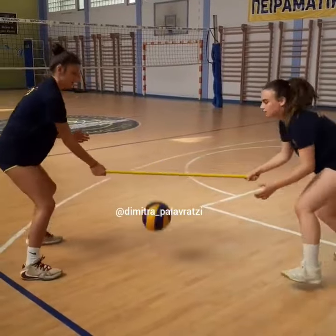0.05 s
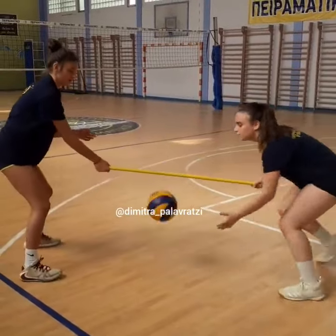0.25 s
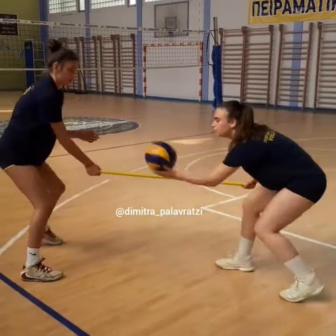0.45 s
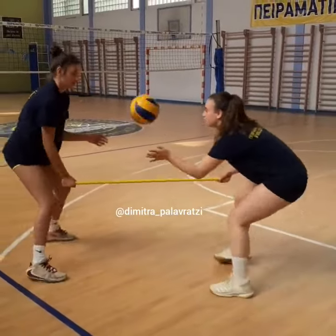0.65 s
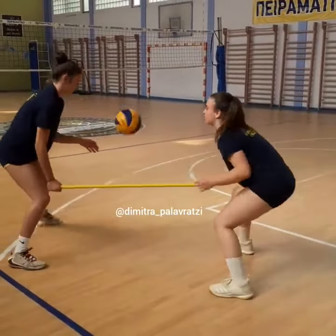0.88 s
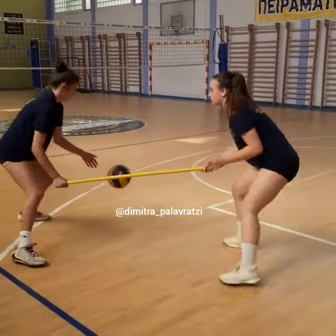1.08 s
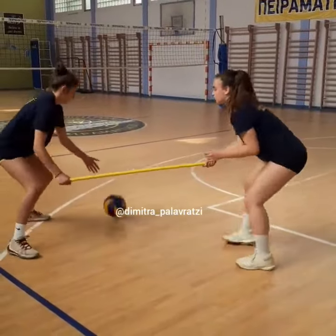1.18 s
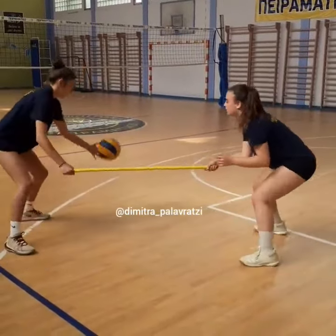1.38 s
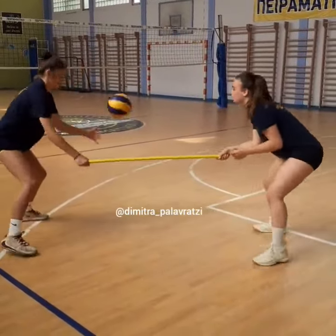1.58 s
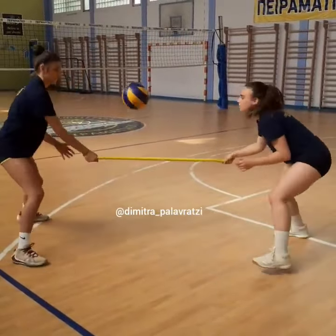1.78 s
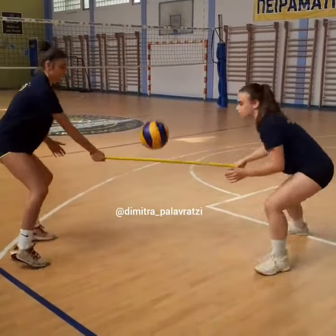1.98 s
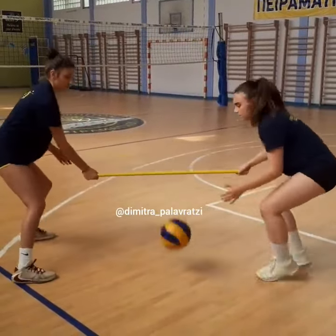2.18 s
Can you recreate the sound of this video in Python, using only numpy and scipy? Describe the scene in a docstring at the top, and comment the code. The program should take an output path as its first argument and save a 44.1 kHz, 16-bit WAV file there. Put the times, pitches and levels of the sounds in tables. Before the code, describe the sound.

A volleyball bounces with a sharp smack and low boom at about 0.2 seconds and again at 1.3, followed by a slightly duller hand slap at 1.6. The ball is close and a little to the right, and each blow echoes at length around a large gym. Soft footsteps and shoe scuffs on the wooden floor continue until about 2.2 seconds, over a faint hall rumble.

```python
"""Three sharp blows of a volleyball, bounced and slapped, echo for seconds round a large gym.
The ball is a little right of a close microphone pair. Each blow is a crack of pressure, the smack of
the cover, a low boom, a knock from the ball's wall and a brief ring of the air inside.
Two players step and scuff around it on the wooden floor, over the hall's lingering wash."""
import sys
import numpy as np
from scipy import signal
from scipy.fft import rfft, irfft, next_fast_len
from scipy.io import wavfile
from scipy.ndimage import uniform_filter1d

SR = 44100
rng = np.random.default_rng(int(sys.argv[2]) if len(sys.argv) > 2 else 0)


def int16_out(signal):
    """Quantize to a 16-bit WAV file."""
    q = np.round(np.clip(np.atleast_2d(signal).T, -1, 1) * 32767)
    wavfile.write(sys.argv[1], SR, q.astype(np.int16))


N = 99225

# Blows on the ball: start_s, crack_db, crack_top_hz, lead_db, slap_db, slap_tilt_db_per_octave, boom_db,
# shell_db, shell_tilt_db_per_octave, shell_attack_s, air_db, air_tilt_db_per_octave, echo_db,
# hall_boom_db, hall_crack_db, hall_tilt_db_per_octave
BLOWS = [(.2035, -5, 3820, -39, -25, 5, -7.5, -17, -15.5, 0.002, -31.5, -1.5, -9, -3, 1, 1.5),
         (1.2618, -4, 6170, -41, -23.5, 6, -13.5, -15, -8, 0.0096, -31, 1.5, -9.5, -3.5, 3, -3.5),
         (1.6414, -6.5, 3340, -33.5, -18, -3, -27, -18.5, 5, 0.0036, -38, 8.5, -5, -1.5, 3, 0)]
# Nearest reflection, one per blow: delay_s
NEAR_ECHO_S = [.0078, .0068, .0081]
# Treble limit, one per blow (a hand is softer than the floor): cutoff_hz
TREBLE_LIMIT_HZ = [15000, 15000, 7800]
BOOM_HZ, BOOM_T60_S, BOOM_ATTACK_S = 123, 0.067, 0.0038
LEAD_S = 0.00287  # a light touch comes before the blow
LEFT_LAG_S, LEFT_DB = 0.00005, -2  # the left microphone hears the ball later and softer
AIR_HALL_DB = -1


def ball():
    """Each blow reaches the microphones directly, then off nearby surfaces, then from the whole hall."""
    out = np.zeros((2, N))
    for echo_s, limit_hz, blow in zip(NEAR_ECHO_S, TREBLE_LIMIT_HZ, BLOWS):
        (start_s, crack_db, top_hz, lead_db, slap_db, slap_tilt, boom_db,
         shell_db, shell_tilt, shell_attack_s, air_db, air_tilt, echo_db,
         hall_boom_db, hall_crack_db, hall_tilt) = blow
        spike = amp(crack_db) * crack(start_s, top_hz)
        air = amp(air_db) * air_ring(start_s, air_tilt)
        touch = amp(lead_db) * cover_slap(start_s - LEAD_S, slap_tilt)
        smack = amp(slap_db) * cover_slap(start_s, slap_tilt)
        bright = filtered(spike + air + touch + smack, lambda hz: 1 / np.sqrt(1 + (hz / limit_hz) ** 6))
        boom = amp(boom_db) * damped_mode(start_s, BOOM_HZ, BOOM_T60_S, BOOM_ATTACK_S)
        low = boom + amp(shell_db) * shell_knock(start_s, shell_tilt, shell_attack_s)
        near = bright + low + amp(echo_db) * delayed(bright, echo_s)
        at_mics = amp([[LEFT_DB], [0]]) * delayed(near, np.array([[LEFT_LAG_S], [0]]))
        clap = filtered(spike, lambda hz: amp(hall_tilt * np.log2(np.maximum(hz, 600) / 2000)))
        into_hall = amp(hall_crack_db) * clap + amp(hall_boom_db) * low + amp(AIR_HALL_DB) * air
        out += at_mics + wall_echoes(bright) + hall_tail(into_hall[None])
    return out


def crack(start_s, top_hz, low_hz=740):
    """The short drop in pressure at first contact."""
    impulse = signal.unit_impulse(N, round(start_s * SR))
    spike = signal.lfilter(*signal.butter(2, top_hz, fs=SR), impulse)
    spike = signal.lfilter(*signal.butter(1, low_hz, 'high', fs=SR), spike)
    return -spike / spike.max()


# Spectrum of the cover's smack: frequency_hz, level_db
SLAP_SPECTRUM = [(200, -31), (500, 4), (900, -15), (2500, 5.5), (3800, -3), (6000, 0.5), (8500, -12),
                 (10000, -10.5), (12500, -15), (16000, -19)]


def cover_slap(start_s, tilt):
    """The cover smacks flat; a harder surface gives more treble."""
    spectrum = [(hz, db + tilt * np.log2(max(hz / 3000, 1))) for hz, db in SLAP_SPECTRUM]
    return noise_burst(start_s, spectrum, t60_s=0.025)


# Modes of the ball's air and cover: pitch_hz, level_db, t60_s
AIR_MODES = [(705, -7, .08), (810, -5, .08), (890, -2, .09), (1030, 0, .08), (1290, -1, .12),
             (1395, -5, .09), (1890, -2, .06), (2050, -4, .06), (2235, -7, .06), (2475, -6, .05),
             (2720, -5, .05), (3160, -7, .05), (3500, -10, .05)]


def air_ring(start_s, tilt):
    """The inflated ball rings briefly, each mode with a random polarity."""
    out = np.zeros(N)
    for hz, db, t60_s in AIR_MODES:
        gain = rng.choice([-1, 1]) * amp(db + tilt * np.log2(hz / 1500))
        out += gain * damped_mode(start_s, hz, t60_s, attack_s=0.00027)
    return out


# Low modes of the ball's wall: pitch_hz, level_db, t60_s
SHELL_MODES = [(226, -4.5, 0.036), (299.6, 2, 0.038), (378.4, -11.5, 0.08)]


def shell_knock(start_s, tilt, attack_s):
    """The ball's wall gives a hollow knock a millisecond after contact."""
    pivot_hz = SHELL_MODES[1][0]
    return sum(amp(db + tilt * np.log2(hz / pivot_hz)) * damped_mode(start_s + 0.001, hz, t60_s, attack_s)
               for hz, db, t60_s in SHELL_MODES)


# Steps around the ball: start_s, thud_db, tap_db, tap_t60_s
STEPS = [(0.067, -40, -42.5, .04), (0.2199, -46, -23.5, 0.059), (0.384, -23.5, -51, 0.045),
         (.494, -35, -37, 0.045), (0.661, -25, -38, 0.032), (0.832, -35, -60, 0.053),
         (1.377, -20.5, -52, 0.017), (1.503, -21.5, -44, .04), (1.556, -18.5, -58, .04),
         (1.8896, -58, -27, 0.022), (2.1746, -36, -36, 0.066), (2.2224, -27, -32.5, 0.1),
         (2.243, -33, -28.5, 0.039)]
# Spectrum of a sole tapping wood: frequency_hz, level_db
TAP_SPECTRUM = [(150, -16), (500, 2), (900, 16.5), (2000, 11.5), (3500, 13.5), (5800, 3.5), (8000, -6),
                (10000, -5), (15000, -37)]
THUD_HZ, THUD_T60_S, THUD_ATTACK_S, STEP_HALL_DB = 109.4, 0.15, 0.0058, -3


def footfalls():
    """Shoes tap the sprung floor, which thuds under them; the hall answers."""
    steps = np.zeros((2, N))
    for start_s, thud_db, tap_db, tap_t60_s in STEPS:
        steps += amp(thud_db) * damped_mode(start_s, THUD_HZ, THUD_T60_S, THUD_ATTACK_S)
        steps += amp(tap_db) * noise_burst(start_s, TAP_SPECTRUM, tap_t60_s)
    return steps + amp(STEP_HALL_DB) * hall_tail(steps)


# Soles and clothes brushing: peak_s, width_s, level_db
SCUFFS = [(.08, 0.082, -52), (0.484, 0.034, -45), (0.691, 0.033, -42), (0.801, 0.072, -49.5),
          (1.191, 0.039, -53), (1.31, 0.091, -45), (1.8, 0.031, -54), (1.92, 0.025, -50.5),
          (2.05, 0.046, -53), (2.245, 0.024, -44)]
# Spectrum of the rubbing: frequency_hz, level_db
SCUFF_SPECTRUM = [(200, -10), (1000, 0), (2500, -3.5), (4500, -3.5), (8000, -4), (10000, -11.5),
                  (13000, -14.5), (16000, -22)]


def scuffs(grit_db=1):
    """Short swells of gritty hiss as soles slide and clothes rub."""
    t = since(0)
    swells = sum(amp(db) * np.exp(-0.5 * ((t - peak_s) / width_s) ** 2) for peak_s, width_s, db in SCUFFS)
    flicker = unit_rms(uniform_filter1d(rng.standard_normal(N), size=90))
    return swells * amp(grit_db * flicker) * unit_rms(diffuse_noise(SCUFF_SPECTRUM))


# Early echoes off the gym walls: delay_s, level_db
WALL_ECHOES = [(.056, -35), (.066, -36), (.12, -24)]


def wall_echoes(sound, band_hz=(770, 2300), jitter_s=0.00014):
    """The walls throw back the midrange, reaching the two microphones slightly apart."""
    mids = signal.sosfilt(signal.butter(1, band_hz, 'band', fs=SR, output='sos'), sound)
    return sum(amp(db) * delayed(mids, delay_s + rng.normal(0, jitter_s, (2, 1)))
               for delay_s, db in WALL_ECHOES)


# Colour of the gym's reverberation: frequency_hz, level_db
HALL_SPECTRUM = [(60, 2.5), (120, -0.5), (200, 4.5), (290, -1), (380, 5.5), (500, -1.5), (680, 3.5),
                 (1000, 2), (1600, 1), (2500, 1.5), (4000, 2.5), (6000, 3), (9000, 4.5), (15000, 3)]
# How long the gym rings: frequency_hz, t60_s
HALL_DECAY = [(100, 1.66), (350, 3.6), (1000, 2.53), (2500, 2.46), (5000, 1.55), (9000, 0.62),
              (15000, 0.67)]
HALL_DB, HALL_DELAY_S, HALL_BUILD_S, HALL_START_GAIN = 1.5, 0.021, 0.18, 0.6


def hall_tail(sound):
    """Reverberation from all round the gym builds up, then each frequency dies at its own speed."""
    hz, frame_s, bands = signal.stft(diffuse_noise(HALL_SPECTRUM), SR, nperseg=256)
    dying = bands * decay(frame_s, curve_at(HALL_DECAY, hz)[:, None])
    tail = signal.istft(dying, SR, nperseg=256)[1][:, :N]
    t = since(HALL_DELAY_S)
    build_up = (t > 0) * (1 - (1 - HALL_START_GAIN) * np.exp(-t / HALL_BUILD_S))
    response = tail * build_up / np.sqrt(SR / 8)
    return amp(HALL_DB) * signal.fftconvolve(sound.mean(0)[None], response, axes=1)[:, :N]


# Room tone of the gym: frequency_hz, level_db
WASH_SPECTRUM = [(15, -67), (25, -9), (70, -7), (134, -1), (180, -12.5), (301, -10), (489, -20.5),
                 (560, -17), (641, -29), (796, -19), (1160, -20.5), (1290, -22.5), (1520, -28),
                 (1700, -27.5), (3920, -35), (8590, -44.5), (16000, -59.5)]
WASH_DB, WASH_FALL_DB_PER_S = -37, 1


def hall_wash():
    """The rumble of earlier play lingers in the hall and slowly sinks."""
    return amp(WASH_DB - WASH_FALL_DB_PER_S * since(0)) * unit_rms(diffuse_noise(WASH_SPECTRUM))


# Likeness of the room sound at the left and right microphones: frequency_hz, correlation
MIC_CORRELATION = [(30, 1), (120, .97), (280, 0.94), (600, 0.37), (1200, 0.04), (2500, 0.068),
                   (5000, -0.16), (12000, -0.015)]


def diffuse_noise(spectrum, left_db=-0.92):
    """Coloured noise from all around: two close microphones share its bass but hardly its treble."""
    def mid_side_gains(hz):
        angle = np.arccos(np.clip(curve_at(MIC_CORRELATION, hz), -1, 1)) / 2
        return amp(curve_at(spectrum, hz)) * [np.cos(angle), np.sin(angle)]

    mid, side = filtered(rng.standard_normal((2, N)), mid_side_gains)
    return np.array([mid + side, mid - side]) * amp([[left_db], [0]])


def noise_burst(start_s, spectrum, t60_s):
    """A dying puff of noise."""
    t = since(start_s)
    return unit_rms(diffuse_noise(spectrum)) * (t > 0) * decay(t, t60_s)


def damped_mode(start_s, hz, t60_s, attack_s):
    """A struck resonance whose envelope swells to 1 and dies away."""
    t = since(start_s)
    envelope = decay(t, t60_s) * (1 - np.exp(-t / attack_s)) ** 1.68
    return envelope / envelope.max() * np.sin(2 * np.pi * hz * t)


def amp(db):
    """Decibels to gain."""
    return 10 ** (np.asarray(db) / 20)


def unit_rms(sound):
    """Scale to rms 1."""
    return sound / np.sqrt(np.mean(sound ** 2) + 1e-20)


def curve_at(points, hz):
    """Interpolate (frequency_hz, value) points on a log frequency axis."""
    point_hz, values = np.transpose(points)
    return np.interp(np.log(hz + 1), np.log(point_hz + 1), values)


def since(start_s):
    """Seconds since start_s, zero before it."""
    return np.maximum(np.arange(N) / SR - start_s, 0)


def decay(t, t60_s):
    """Exponential fall of 60 dB every t60_s."""
    return np.exp(-np.log(1000) * t / t60_s)


def filtered(sound, response):
    """Apply a complex response, given as a function of frequency."""
    size = next_fast_len(N + SR // 2)
    hz = np.fft.rfftfreq(size, 1 / SR)
    return irfft(rfft(sound, size) * response(hz), size)[..., :N]


def delayed(sound, delay_s):
    """The sound arriving delay_s later."""
    return filtered(sound, lambda hz: np.exp(-2j * np.pi * hz * delay_s))


def scene():
    """Ball, players and hall as they reach the microphone pair."""
    return ball() + footfalls() + scuffs() + hall_wash()


# Colour of the microphones: frequency_hz, gain_db
MIC_RESPONSE = [(100, -0.5), (170, 1.5), (300, 0), (2600, 0), (3800, -2), (5800, 0), (8500, -1),
                (10000, -5), (12500, 1), (16000, 3.5)]
LOW_CUT_HZ, MIC_TOP_HZ = 112, 15900


def record(dry):
    """The microphones cut the deep bass, colour the rest and pass nothing above their band limit."""
    thinned = signal.lfilter(*signal.butter(2, LOW_CUT_HZ, 'high', fs=SR), dry)
    return filtered(thinned, lambda hz: amp(curve_at(MIC_RESPONSE, hz)) * (hz < MIC_TOP_HZ))


dry = scene()
out = record(dry)
int16_out(out)
```